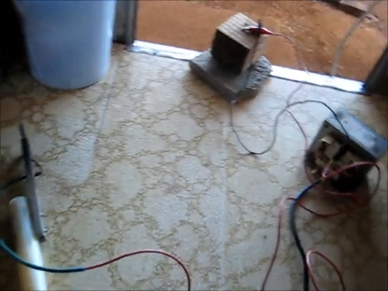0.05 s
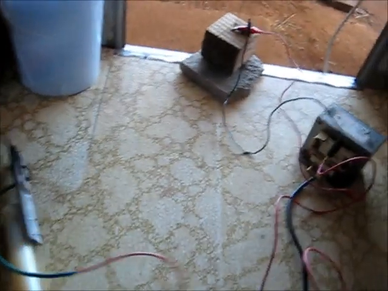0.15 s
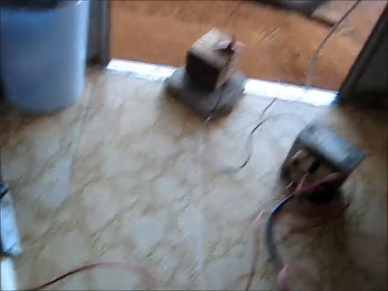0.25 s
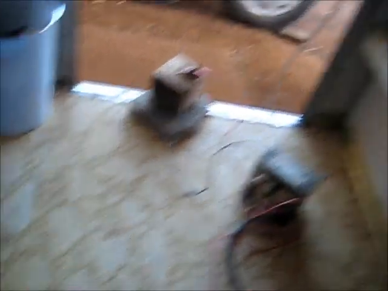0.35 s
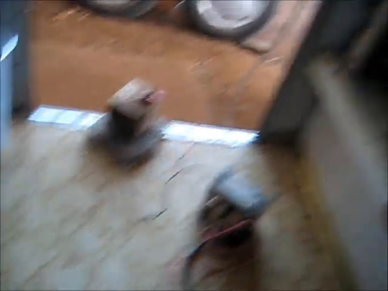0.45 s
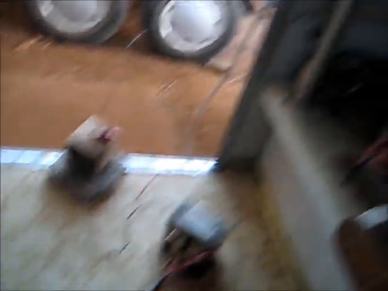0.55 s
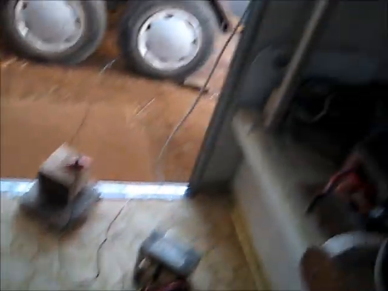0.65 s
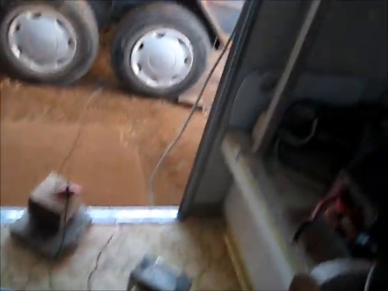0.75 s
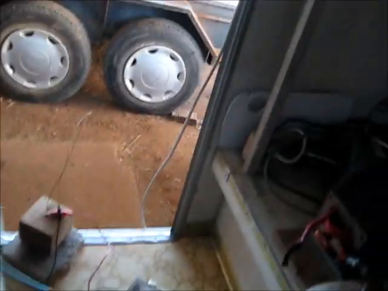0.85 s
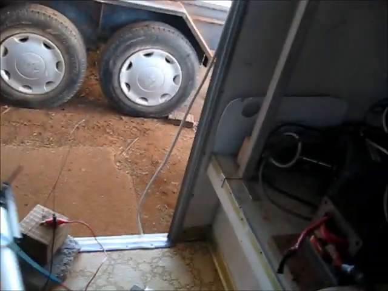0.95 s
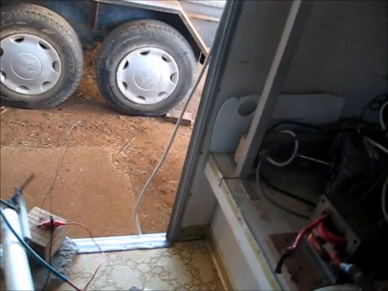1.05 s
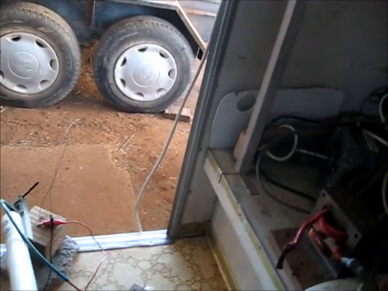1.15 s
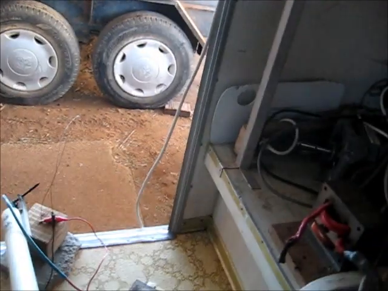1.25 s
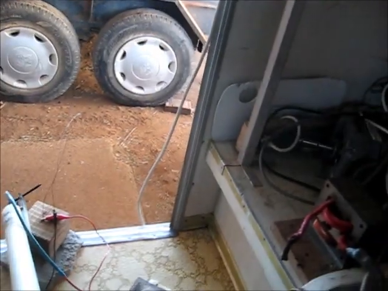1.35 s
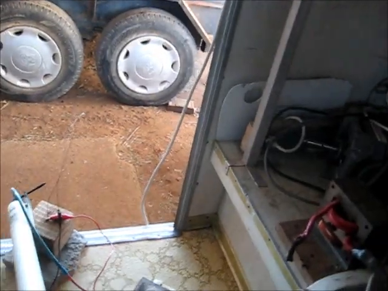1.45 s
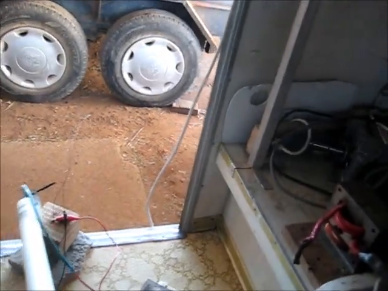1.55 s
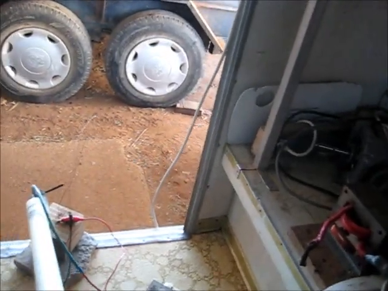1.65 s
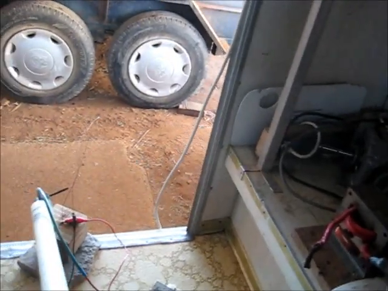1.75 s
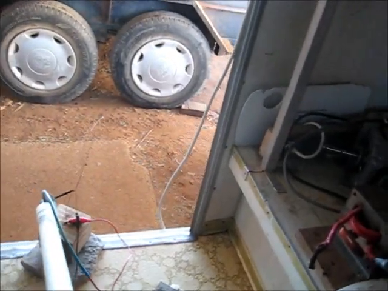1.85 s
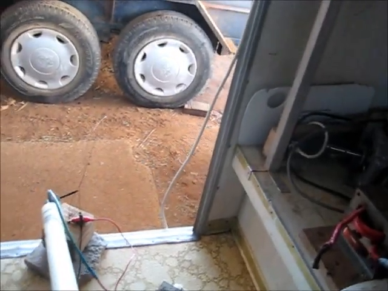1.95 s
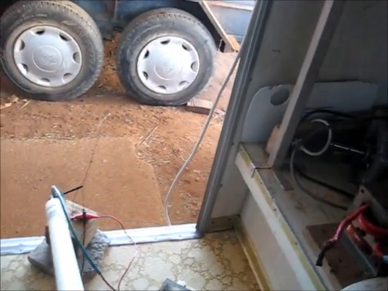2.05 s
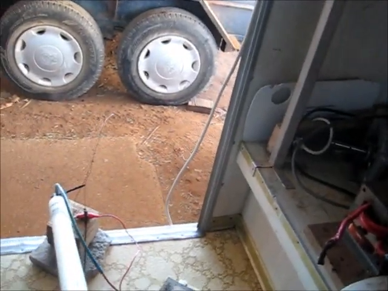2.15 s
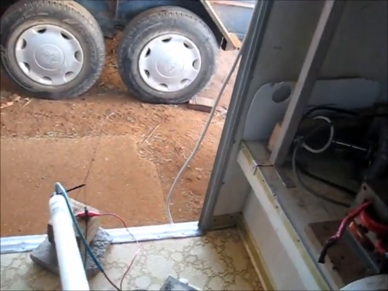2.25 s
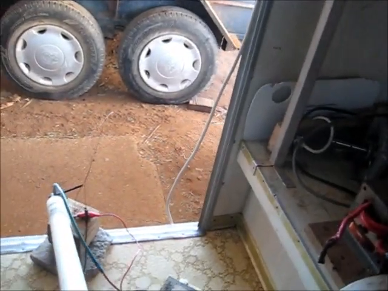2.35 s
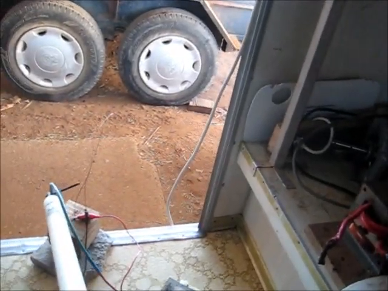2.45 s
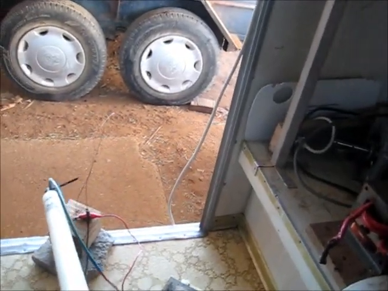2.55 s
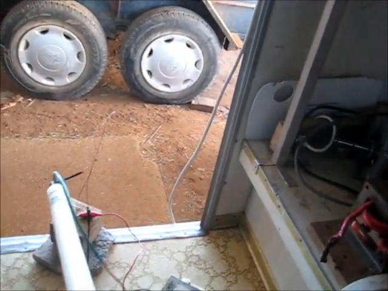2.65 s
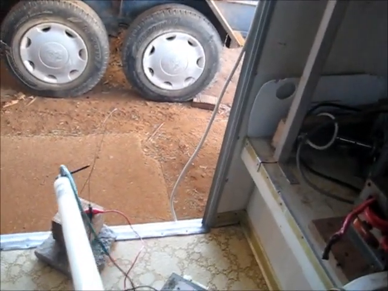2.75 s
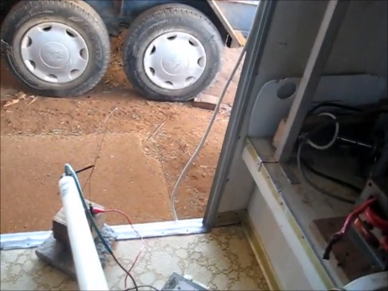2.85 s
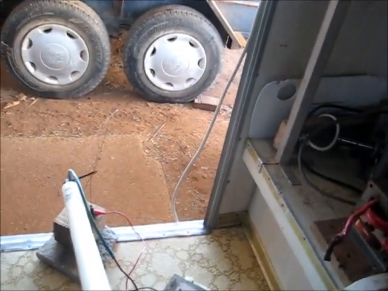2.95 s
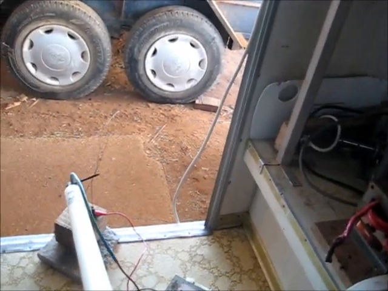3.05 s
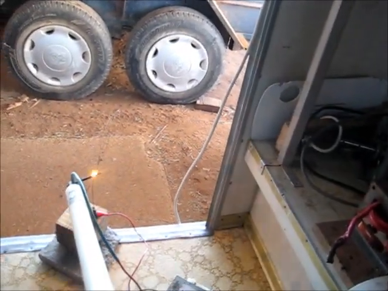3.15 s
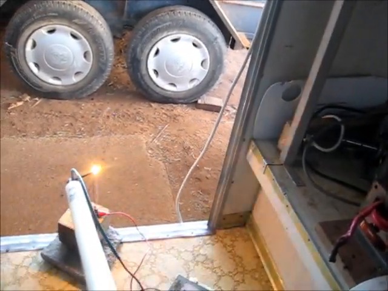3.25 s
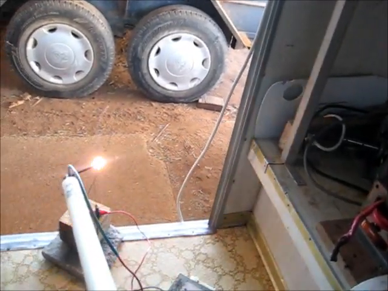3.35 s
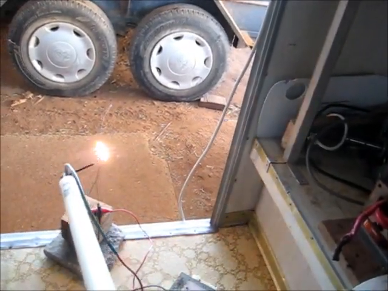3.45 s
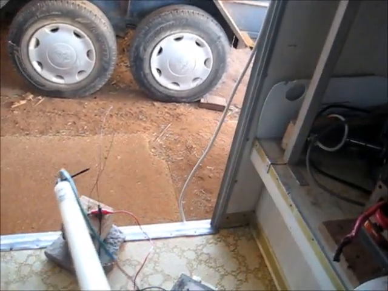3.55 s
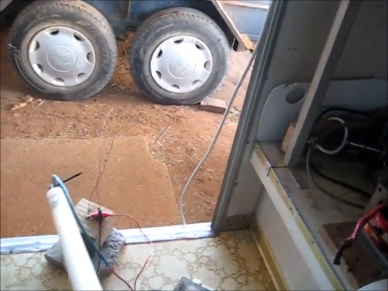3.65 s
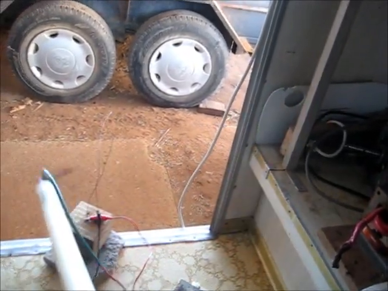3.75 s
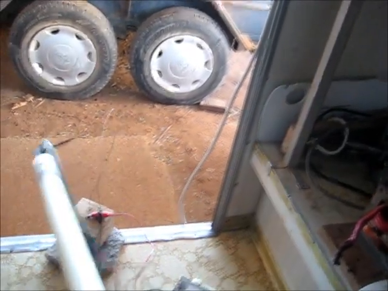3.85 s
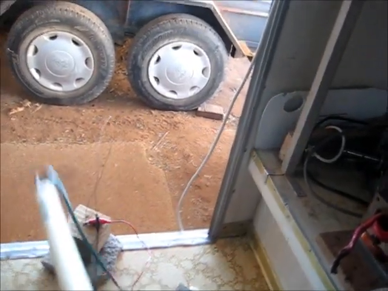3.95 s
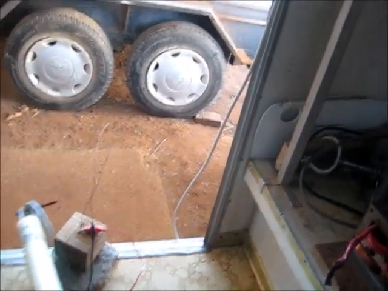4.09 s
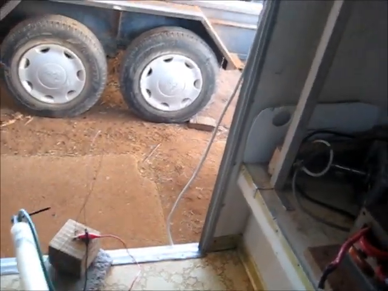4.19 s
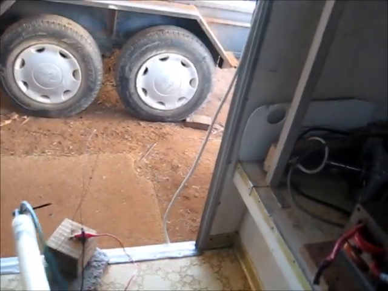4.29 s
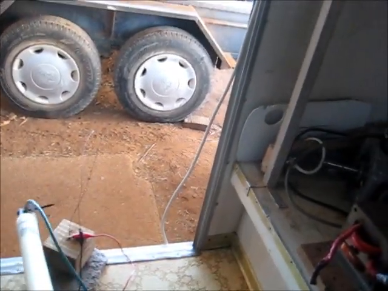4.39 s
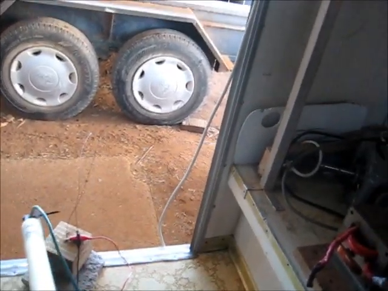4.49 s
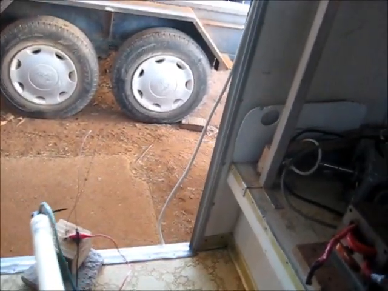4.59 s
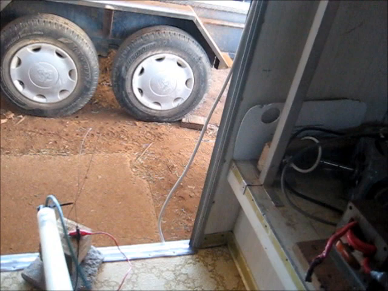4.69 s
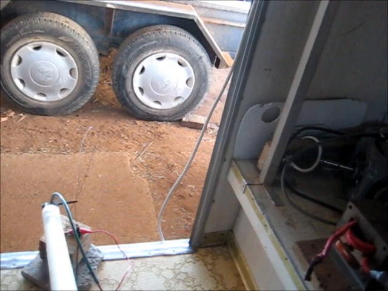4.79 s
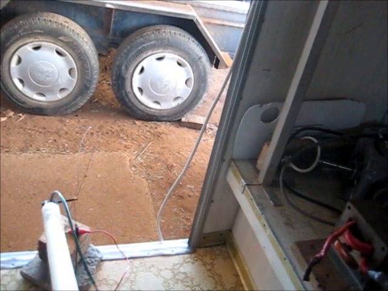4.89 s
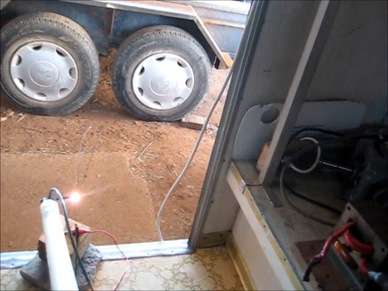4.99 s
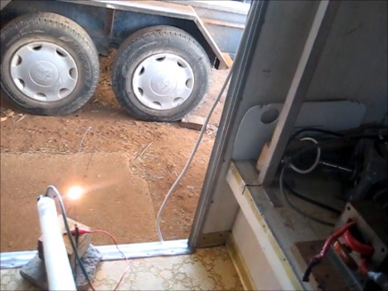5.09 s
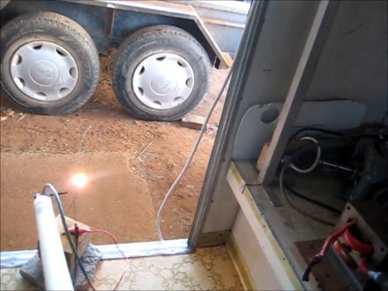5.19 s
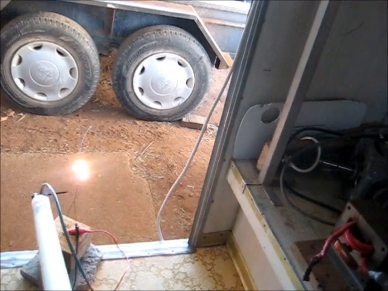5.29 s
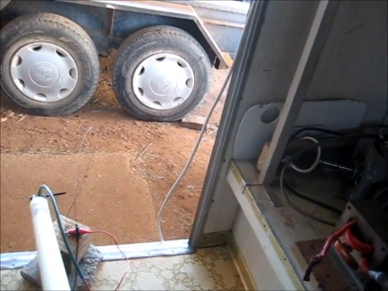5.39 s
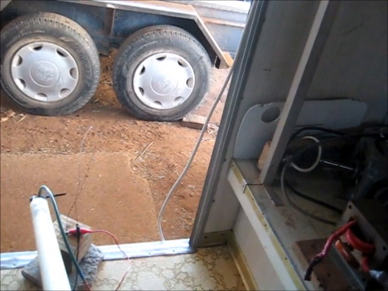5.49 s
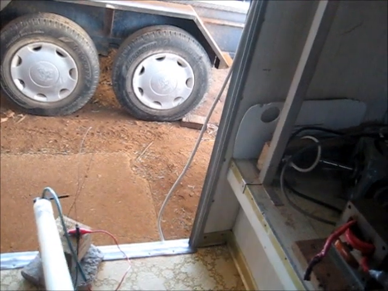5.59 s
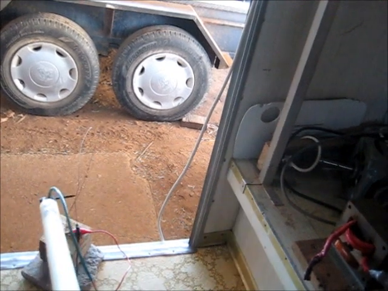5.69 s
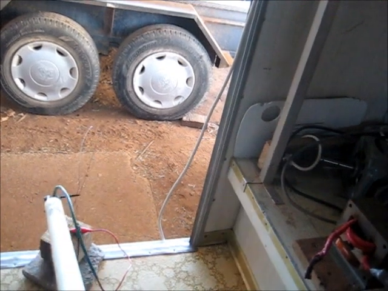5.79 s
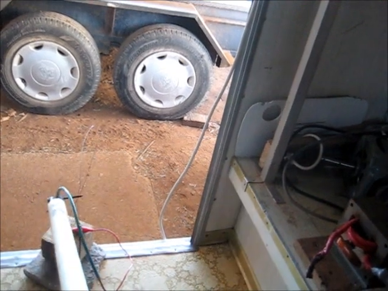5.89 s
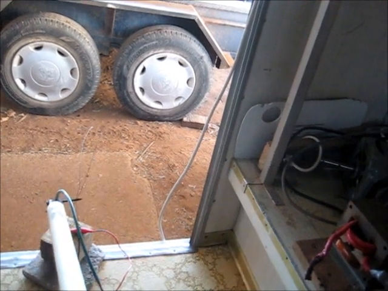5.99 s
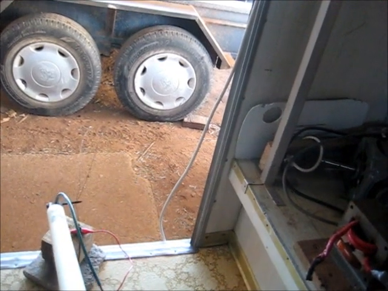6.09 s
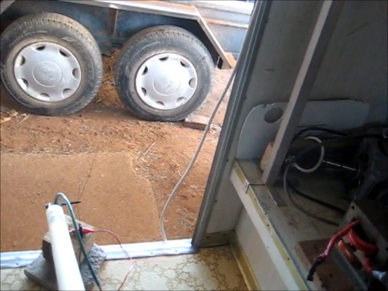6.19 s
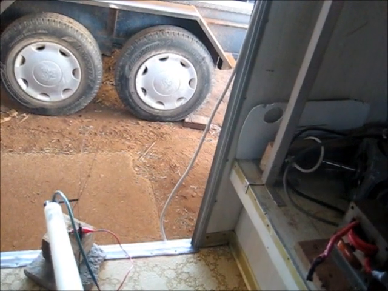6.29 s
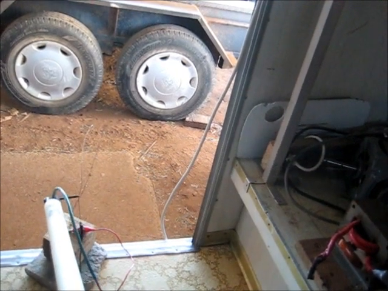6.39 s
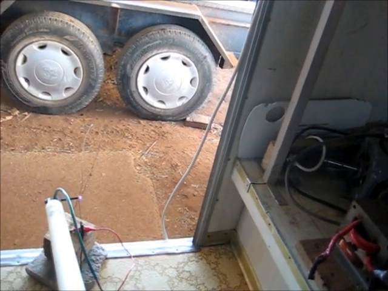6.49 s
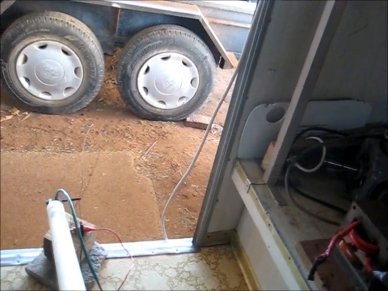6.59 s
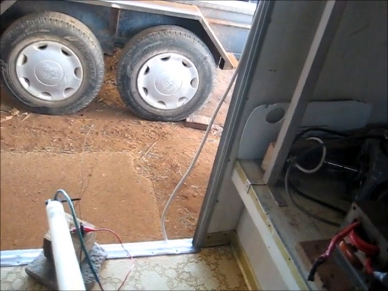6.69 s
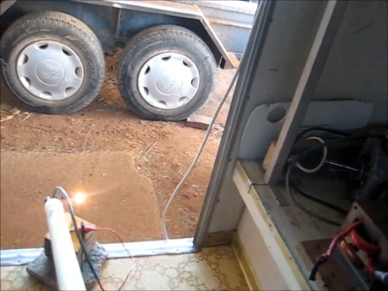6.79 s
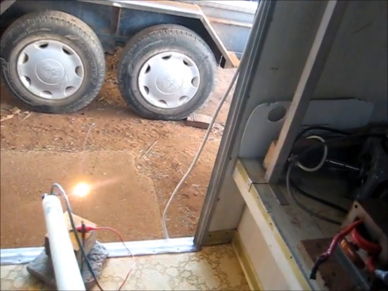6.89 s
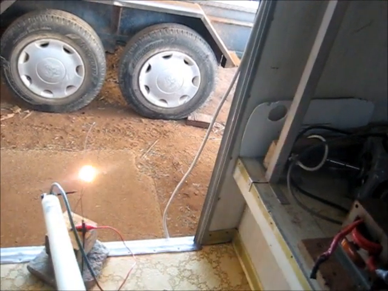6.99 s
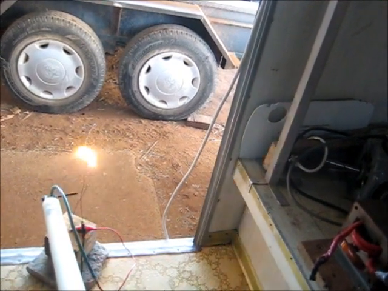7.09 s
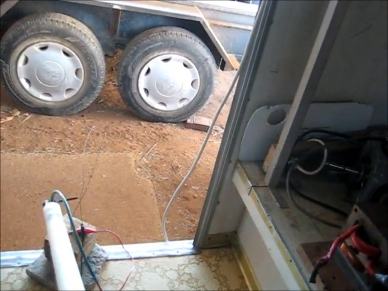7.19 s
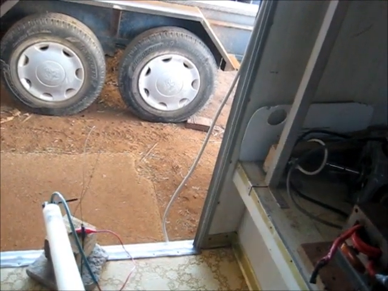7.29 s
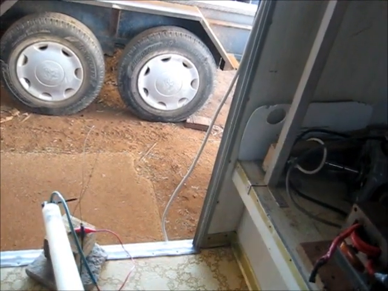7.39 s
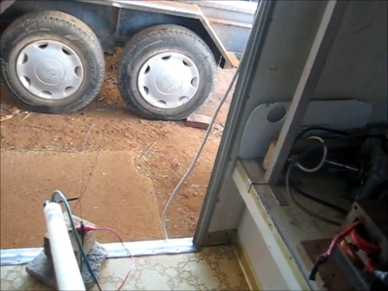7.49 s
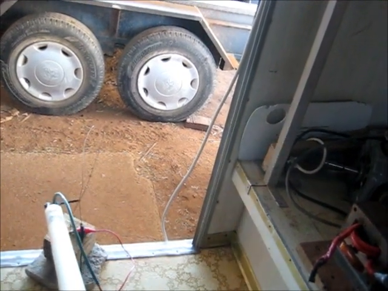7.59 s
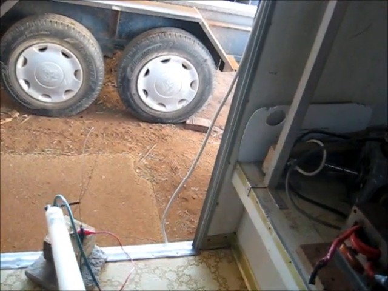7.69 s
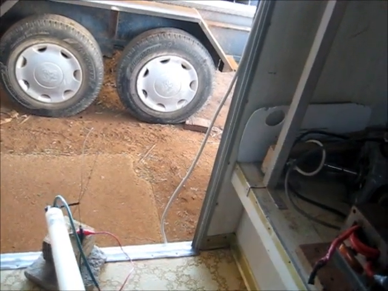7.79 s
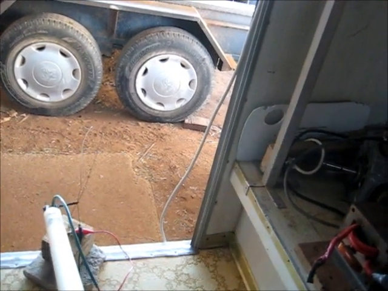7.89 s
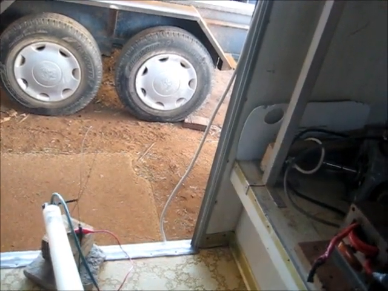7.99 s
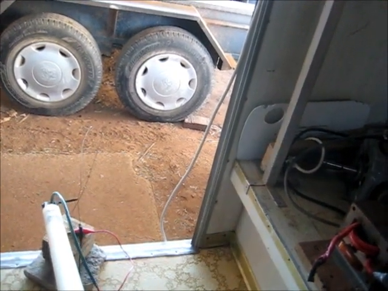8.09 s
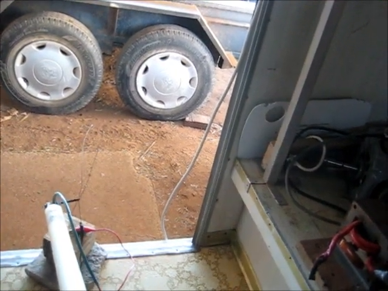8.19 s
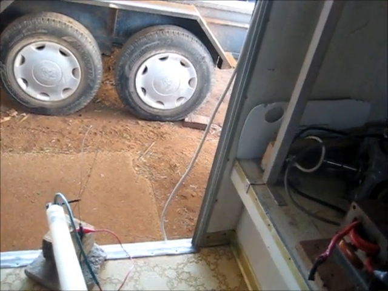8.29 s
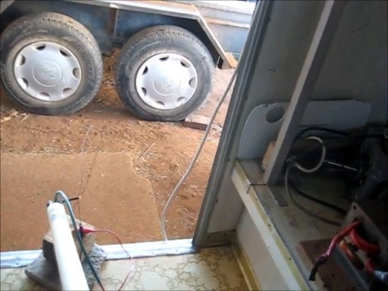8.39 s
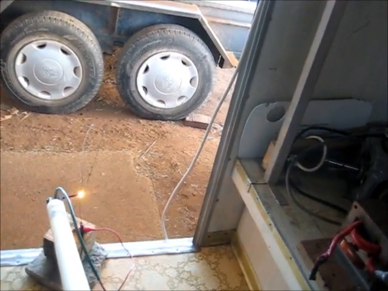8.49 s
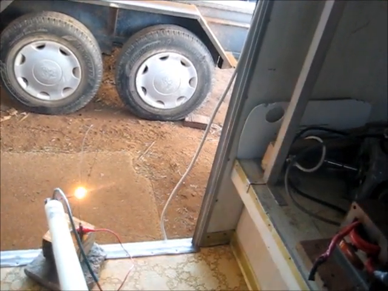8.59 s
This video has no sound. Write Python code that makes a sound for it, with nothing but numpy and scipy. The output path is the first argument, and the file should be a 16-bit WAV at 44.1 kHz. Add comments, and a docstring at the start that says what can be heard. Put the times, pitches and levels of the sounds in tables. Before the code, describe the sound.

Four short electric arcs buzz and crackle at double mains rate in a small workshop doorway, over faint transformer hum, hiss and handling knocks.

```python
"""Arcs drawn from a transformer

In the doorway of a small workshop an electrode on a plastic pipe draws four arcs from a mains transformer.
Each touch clicks and scrapes, as sparks and chatter ring the electrode. The arc then restrikes 100 times a second:
spark noise sizzles while it is short, restrike impulses crack and harmonics drone as it stretches, until it breaks.
The idle core hums under a steady hiss; the pipe knocks and ticks as it is handled, some of it close to the microphone.
"""
import sys
import numpy as np
from scipy import signal
from scipy.fft import rfft, irfft
from scipy.io import wavfile
from scipy.ndimage import uniform_filter1d

SR = 44100
rng = np.random.default_rng(int(sys.argv[2]) if len(sys.argv) > 2 else 0)


def store_wav(level_fs):
    """Save 16-bit WAV to argv[1]."""
    pcm = np.round(np.clip(np.atleast_2d(level_fs), -1, 1) * 32767)
    wavfile.write(sys.argv[1], SR, pcm.T.astype(np.int16))


N = 381198
T = np.arange(N) / SR

BUZZ_HZ = 100  # two half cycles of the mains
STRIKE_S = .0079  # where the restrike falls in each half cycle
# arc length runs from 0 at the terminal to 1 where it breaks; the column flares up at this length
FLARE_LENGTH = 0.28
# the arcs: [electrode touches t/s, arc strikes t/s, time to catch/s, dwell before the pull/s,
# length of the pull/s, arc breaks t/s, relative level/dB]
ARCS = [(3.02, 3.142, .007, 0.01, 0.31, 3.565, 0.76), (4.912, 4.909, .002, 0.075, 0.23, 5.404, 0.77),
        (6.559, 6.798, .004, 0.0083, 0.12, 7.178, -.6), (8.329, 8.448, 0.062, .006, .375, 8.98, 0.9)]
# snaps, the hardest restrikes: [t/s, relative level/dB]
SNAPS = [(3.2276, -6), (3.2378, -7), (3.2968, -2), (3.3149, -4), (3.3571, -1), (3.3988, 4), (3.4478, -3),
         (3.5378, -6), (5.0686, -6), (5.0776, -1.5), (5.1357, 1.5), (5.1681, 4), (5.1782, 0.5),
         (5.1884, -3.5), (5.1981, -2), (5.2276, 0), (5.2876, -2), (5.3787, -2.5), (6.888, -3), (6.8976, -2),
         (6.9276, 1), (6.958, 1.5), (6.9688, -1), (7.0078, 2.5), (7.0186, 3), (8.5289, -1.5), (8.5778, -3)]


def amp(db):
    """Decibels to gain."""
    return 10 ** (np.asarray(db) / 20)


def unit(x):
    """Scale to rms 1."""
    return x / np.sqrt(np.mean(x ** 2))


def noise():
    """White noise."""
    return rng.standard_normal(N)


def walk(rate):
    """Smooth random motion with a spread near 1, renewed at the given rate in Hz."""
    k = int(SR / rate)
    steps = np.repeat(rng.standard_normal(N // k + 1), k)
    return 1.4 * uniform_filter1d(steps, k)[:N]


def through(x, response):
    """Pass a sound through an impulse response."""
    return signal.fftconvolve(x, response)[:N]


def colour(points, size=4096):
    """Causal response of unit energy with the given (f/Hz, level/dB) spectrum."""
    hz, db = np.transpose(points)
    bins_hz = np.arange(size // 2 + 1) * SR / size
    gain = amp(np.interp(np.log(bins_hz + 1), np.log(hz), db))
    # folding the cepstrum gives minimum phase
    cepstrum = irfft(np.log(unit(gain)))
    cepstrum[1:size // 2] *= 2
    cepstrum[size // 2 + 1:] = 0
    return irfft(np.exp(rfft(cepstrum)))


def ring(modes, size=16384):
    """Response of unit energy of (f/Hz, level/dB, t60/s) modes."""
    t = T[:size]
    y = sum(amp(db) * np.exp(-np.log(1000) * t / t60) * np.cos(2 * np.pi * hz * t) for hz, db, t60 in modes)
    y *= 1 - np.exp(-4 * t * max(modes)[0])  # contact lasts a fraction of a cycle
    return y / np.linalg.norm(y)


def rattle(t60, size=16384):
    """Dying noise of unit energy, even across the spectrum."""
    decay = np.exp(-np.log(1000) * T[:size] / t60)
    spectrum = rfft(rng.standard_normal(size) * decay)
    smooth_power = uniform_filter1d(np.abs(spectrum) ** 2, size=size // 80)
    y = irfft(spectrum / np.sqrt(smooth_power))
    return y / np.linalg.norm(y)


def blows(times, gains):
    """Single impulses at the given times."""
    samples = np.clip(np.asarray(times) * SR, 0, N).astype(int)
    return np.bincount(samples, gains, N + 1)[:N]


def play(rows, sound):
    """Place sound(other columns) at each row's time and level."""
    out = np.zeros(N)
    for s, db, *rest in rows:
        i = int(s * SR)
        y = sound(*rest)[:N - i]
        out[i:i + len(y)] += amp(db) * y
    return out


def envelope(rows, attack_s, release_s):
    """Gain of (t/s, length/s, level/dB) strokes that rise, hold and die away."""
    gain = np.zeros(N)
    for s, hold, db in rows:
        rise = np.clip((T - s) / attack_s, 0, 1)
        fall = np.exp(-np.clip((T - s - hold) / release_s, 0, 50))
        gain += amp(db) * rise * fall
    return gain


def room(x, wet_db, low_t60=0.21, high_t60=0.15):
    """Close walls answer within a millisecond and die quickly, the treble first."""
    low, high = (signal.butter(2, 2800, kind, fs=SR, output="sos") for kind in ("low", "high"))
    tail = signal.sosfilt(low, rattle(low_t60)) + signal.sosfilt(high, rattle(high_t60))
    tail += amp(-3) * rattle(0.053)
    response = np.r_[1, np.zeros(40), amp(wet_db) * tail]
    return through(x, response / np.linalg.norm(response))


def background():
    """Steady coloured hiss with the thin whine of the camera's electronics, tones of unsteady phase."""
    # spectrum of the hiss: [f/Hz, relative level/dB]
    air_spectrum = [(25, -20.5), (70, -17.5), (110, -16), (200, -13), (800, -13.5), (2000, -16.5),
                    (5300, -20), (6300, -19), (8200, -24), (10700, -23.5), (12800, -28.5), (15800, -29.5)]
    # whining tones: [f/Hz, rms level/dB]
    whine_tones = [(7558, -69), (7870, -76), (15150, -64.5)]
    whine = sum(amp(db) * np.sin(2 * np.pi * hz * T + 0.84 * walk(90)) for hz, db in whine_tones)
    return amp(-49.14) * through(noise(), colour(air_spectrum)) + np.sqrt(2) * whine


def transformer():
    """The core hums in mains harmonics at idle and falls back from each touch until the arc breaks."""
    # harmonics of the idle hum: [f/Hz, rms level/dB]
    hum_tones = [(100, -73.5), (300, -56), (400, -65.5), (600, -88), (800, -76), (900, -71.5)]
    load = sum((T > touch) & (T < breaks) for touch, *_, breaks, _ in ARCS)
    sag_db = -8 * uniform_filter1d(load.astype(float), size=1500)
    hum = np.zeros(N)
    for hz, db in hum_tones:
        turns = BUZZ_HZ * round(hz / BUZZ_HZ) * T + rng.random()
        hum += amp(db + .5 * walk(5.2)) * np.sin(2 * np.pi * turns)
    return np.sqrt(2) * hum * amp(sag_db)


def handling():
    """Pipe and feet knock as dull noise bursts with a bright edge; metal modes clink, shaped noise rustles."""
    # knocks of the pipe and of feet on the floor: [t/s, relative body level/dB, relative edge level/dB]
    knock_rows = [(0.142, -19, -7.5), (0.198, -21, -8.5), (0.4, -16, -11), (0.968, -8, -10),
                  (0.98, -16, -16), (1.6, -8.5, -20), (3.885, -15, -5), (3.913, -20, -10),
                  (4.007, -23, -17), (4.187, -7, -9), (4.22, -18, -10.5), (4.456, -3.5, -8)]
    # spectrum of the knock's body: [f/Hz, relative level/dB]
    body_spectrum = [(100, -25), (280, -8.5), (750, 1), (1500, -3), (2200, -5.5), (4000, -17), (10000, -40)]
    # spectrum of the knock's bright edge: [f/Hz, relative level/dB]
    edge_spectrum = [(1000, -14), (2400, 1.5), (3600, 0.5), (7000, -9), (14000, -26)]
    # light metal clinks: [t/s, relative level/dB]
    clink_rows = [(2.176, -33.5), (2.1914, -35), (2.2169, -34), (2.354, -35.5), (2.408, -25.5)]
    # modes of the clinking metal: [f/Hz, relative level/dB, t60/s]
    clink_modes = [(3090, 4, 0.019), (4587, -5, .022), (5460, -6, .012), (6400, -2, .018), (8860, -2, .022),
                   (11000, -3.5, 0.02), (13200, -15, .015)]
    # rustle of sleeves and shoes: [t/s, length/s, relative level/dB, relative treble level/dB]
    rustle_rows = [(0, 0.53, -49.5, -49.5), (0.52, 0.077, -41.5, -37), (.64, .25, -57, -51.5),
                   (3.887, 0.082, -44, -44.5), (3.98, 0.074, -39, -54), (5.435, .07, -46, -74)]
    body = play([(s, db) for s, db, _ in knock_rows], lambda: through(rattle(0.03), colour(body_spectrum)))
    edge = play([(s, db) for s, _, db in knock_rows], lambda: through(rattle(0.014), colour(edge_spectrum)))
    clinks = play(clink_rows, lambda: ring(clink_modes) + 0.54 * rattle(.02))

    low = through(noise(), colour([(50, -31), (150, -6), (450, 0.0), (850, 3.0), (2200, -2.5), (5000, -22.0)]))
    high = through(noise(), colour([(300, -19), (1200, -15), (3600, -0.5), (7000, -7), (14000, -19.0)]))
    attack_s, release_s = 0.025, 0.016
    low *= envelope([(s, hold, db) for s, hold, db, _ in rustle_rows], attack_s, release_s)
    high *= envelope([(s, hold, db) for s, hold, _, db in rustle_rows], attack_s, release_s)
    rustle = (amp(-3) * low + amp(-1) * high) * amp(2.8 * walk(120))
    return body + amp(-1.0) * edge + amp(14) * clinks + rustle


def tick(hz):
    """Creaking plastic: a few cycles that swell and die within milliseconds."""
    rise = 1 - np.exp(-T[:1024] / 0.0003)
    y = rise * ring([(hz, 0, .0035)], size=1024)
    return y / np.linalg.norm(y)


def near_sounds():
    """Ticks, dry impulses and ringing bumps so close to the microphone that the room hardly answers."""
    # plastic creaking in the grip: [t/s, relative level/dB, f/Hz]
    tick_rows = [(1.435, -15, 3340), (1.651, -9.0, 4000), (1.759, -16.0, 3830), (1.904, -22.5, 3900),
                 (3.711, -10.5, 2900), (4.6, -15.5, 6100), (6.137, -18.5, 2880), (8.079, -16.5, 2770)]
    # dry clicks close to the microphone: [t/s, relative level/dB]
    click_rows = [(0.1982, -15), (0.4497, -3.5), (0.4562, -14), (1.4355, -16.0), (3.9165, -6.5),
                  (3.9442, -13), (3.9627, -10.5)]
    # bumps on the camera body: [t/s, relative level/dB]
    bump_rows = [(0.157, -35), (0.196, -42.5)]
    bump_modes = [(114, -7, .1), (144, 4, 0.15), (191, -1, 0.086),
                  (270, -16, 0.077), (345, 7.5, 0.06), (420, 5, 0.065)]  # (f/Hz, relative level/dB, t60/s)
    clicks = play(click_rows, lambda: colour([(500, -2), (3000, 3.5), (7000, 6.5), (15000, -5.0)]))
    bumps = play(bump_rows, lambda: ring(bump_modes))
    return play(tick_rows, tick) + amp(-2.5) * clicks + amp(27.5) * bumps


def electrode():
    """The tip sparks on touching, then chatters in random impulses over the terminal and rings."""
    # sparks as the electrode touches: [t/s, relative level/dB]
    touch_rows = [(3.02, -11), (3.0254, -12), (3.1016, -20), (3.147, -20), (4.9105, -20.5), (6.559, -13.5),
                  (6.6047, -14), (6.804, -15.5), (8.329, -17), (8.392, -24.5)]
    # spectrum of a touch: [f/Hz, relative level/dB]
    touch_spectrum = [(300, -11), (1600, -14.5), (2100, 0), (3500, -2), (6000, 1.5), (10000, 1),
                      (15000, -2.5)]
    # the electrode sliding on the terminal: [t/s, length/s, relative level/dB]
    slide_rows = [(3.02, .03, -37.5), (3.05, 0.072, -46.5), (4.912, 0.063, -40), (6.558, .13, -39),
                  (6.712, 0.085, -45), (8.329, 0.028, -44), (8.405, 0.052, -43.5)]
    # ringing of the electrode as it slides: [f/Hz, relative level/dB]
    rod_spectrum = [(500, -24), (1850, -11.5), (2050, 1.5), (2320, -7), (2620, -1), (2850, 0.5), (3150, 2),
                    (3900, -16), (5400, -9.5), (6300, -5.5), (7500, -12), (14000, -18)]

    def spark():
        """An impulse with a short rattle, in the colour of a touch."""
        return through(np.r_[1, np.zeros(2047)] + 0.78 * rattle(0.013, size=2048), colour(touch_spectrum))

    chatter = unit(noise() * (rng.random(N) < .02) * amp(5.3 * np.tanh(walk(120))))
    chatter *= envelope(slide_rows, attack_s=.005, release_s=0.007)
    return amp(9.5) * play(touch_rows, spark) + amp(-1) * through(chatter, colour(rod_spectrum))


def column():
    """Length of the arc and its gain: it catches, dwells, is pulled out and creeps longer until it breaks."""
    pulled_length = 0.87  # where the pull ends
    length, gain = np.zeros((2, N))
    for _, strike, catch, dwell, pull, breaks, db in ARCS:
        lit = (T >= strike) & (T < breaks)
        pull_s = strike + dwell
        length[lit] = np.interp(T[lit], [pull_s, pull_s + pull, breaks], [0, pulled_length, 1])
        gain[lit] = np.minimum((T[lit] - strike) / catch, 1) * amp(db)
    return length, uniform_filter1d(gain, size=128)


def drone(length, gain):
    """The long arc heats the air twice a mains cycle: wavering harmonics that grow all the way with length."""
    # harmonics of the drone: [multiple of the buzz, relative level/dB]
    harmonics = [(1, -18), (2, -7.5), (3, -3.5), (4, -5), (5, -13), (6, 5), (7, -11), (8, -18), (9, -1),
                 (10, -15), (11, 0)]
    full_db, rise_db = -36.5, 27
    strain_s, strain_db = 0.023, 3.5  # the swell just before the arc breaks
    turn = 2 * np.pi * BUZZ_HZ * (T - STRIKE_S)
    tone = sum(amp(db + 2 * walk(25)) * np.cos(k * turn + 0.59 * walk(30)) for k, db in harmonics)
    strain = sum(np.exp(-np.abs(T - breaks) / strain_s) for *_, breaks, _ in ARCS)
    level_db = full_db - rise_db * (1 - length) + strain_db * strain
    return unit(tone) * uniform_filter1d(gain * amp(level_db), size=800)


def snap(hz):
    """A hard restrike: a brief shock, lower for a bigger channel, with a short sputter."""
    shock = colour([(hz / 10, -28), (hz * 0.37, -2), (hz, 0), (hz * 1.62, -7), (hz * 5, -22)])
    return through(np.r_[1, np.zeros(1023)] + 0.43 * rattle(0.0065, size=1024), shock)


def snaps(length):
    """Each snap takes its pitch from its strength and the length of the arc: longer and louder is lower."""
    base_hz = 8600  # centre of a 0 dB snap in the shortest arc
    octaves_per_length, octaves_per_db = 1.96, 0.06
    rows = []
    for s, db in SNAPS:
        octaves_down = octaves_per_length * length[int(s * SR)] + octaves_per_db * db
        rows.append((s, db, base_hz / 2 ** octaves_down))
    return amp(1.5) * play(rows, snap)


def restrikes(jitter_s, scatter_db):
    """One uneven impulse in each half cycle of the mains."""
    times = np.arange(0, N / SR, 1 / BUZZ_HZ) + STRIKE_S
    late, size = rng.standard_normal((len(times), 2)).T
    return unit(blows(times + jitter_s * late, amp(scatter_db * np.clip(size, -2, 2))))


def arc(length, gain):
    """Tiny sparks crowd before each restrike, and the restrike itself cracks."""
    # spectrum of the sizzle: [f/Hz, relative level/dB]
    sizzle_spectrum = [(300, -23.5), (750, -17), (1100, -6), (1650, -9.5), (2150, -4.5), (2800, -5),
                       (4500, -2), (6500, 1), (9500, 1), (13000, 0), (15500, -9.5)]
    # crack of a short arc: [f/Hz, relative level/dB]
    short_crack = [(100, -36), (500, -17.5), (750, -14.5), (1050, -0.5), (1300, -4.5), (1700, -9.5),
                   (2130, 6), (2850, -9.5), (3800, -0.5), (5500, -11), (12000, -29)]
    # crack of a fully drawn arc: [f/Hz, relative level/dB]
    long_crack = [(100, -29), (480, -10), (680, -2.5), (1050, -1.5), (1300, -2.5), (2100, -5), (2900, -3),
                  (3900, -7), (5500, -12.5), (12000, -23)]
    # relative levels: the sizzle peaks at the flare, then fades as the arc stretches
    sizzle_db, sizzle_rise_db, sizzle_fade_db = -29, 6, 6
    # the gain of the crack grows until the flare, then holds
    crack_db, crack_rise_db = -34, 17.5
    # a snap unsettles the column, so that the next restrikes crack and sizzle harder
    surge_s, surge_crack_db, surge_sizzle_db = 0.018, 8, 3.5

    short = np.clip(1 - length / FLARE_LENGTH, 0, 1)
    stretch = np.clip((length - FLARE_LENGTH) / (1 - FLARE_LENGTH), 0, 1)
    snap_blows = blows([s for s, _ in SNAPS], amp([db for _, db in SNAPS]))
    surge = np.tanh(through(snap_blows, np.exp(-T[:16384] / surge_s)))
    gain = gain * amp(0.8 * walk(29.97))  # the level flickers at random
    sizzle_level_db = sizzle_db - sizzle_rise_db * short - sizzle_fade_db * stretch + surge_sizzle_db * surge
    crack_gain = gain * amp(crack_db - crack_rise_db * short + surge_crack_db * surge)
    hot = length ** 3.5  # near 1 when the column is long and hot
    swing = (1 + np.cos(2 * np.pi * BUZZ_HZ * (T - STRIKE_S + 0.00041))) / 2

    sparks = noise() * (rng.random(N) < .025) * amp(3.2 * noise())
    # a short arc goes quiet between restrikes; a long one keeps hissing
    sizzle = unit(sparks * (0.16 + 0.33 * hot + swing ** 3.6))
    sizzle += amp(-3.5 - 3 * length) * restrikes(jitter_s=0.00046, scatter_db=2.0)
    sizzle = through(sizzle * gain * amp(sizzle_level_db), colour(sizzle_spectrum))
    # a thick channel cracks more and loses its finest sparkle
    thickness = np.clip(1.1 * length, 0, .8)
    sizzle = (1 - thickness) * sizzle + thickness * uniform_filter1d(sizzle, size=3)

    strikes = restrikes(jitter_s=.00018, scatter_db=1.5)
    # each restrike trails a fresh cluster of small breakdowns
    cluster = unit(noise() * through(np.abs(strikes), np.exp(-T[:512] / 0.001)))
    hiss = unit(noise() * (0.39 + swing))
    crack = crack_gain * (amp(-4) * strikes + amp(-4) * cluster + amp(-4.5) * hiss)
    crack = through(crack * (1 - hot), colour(short_crack)) + through(crack * hot, colour(long_crack))
    return amp(2.0) * sizzle + crack


def scene():
    """All sources reach one microphone, heard alike on both channels; the drone, hum and hiss stay dry."""
    mono = background() + transformer()
    mono += room(handling(), wet_db=-1.5)
    mono += room(near_sounds(), wet_db=-10.5)
    mono += room(electrode(), wet_db=-1.5)
    length, gain = column()
    mono += drone(length, gain)
    mono += room(arc(length, gain) + snaps(length), wet_db=-1.5)
    return np.array([mono, mono])


def record(dry):
    """The camera cuts the top with a steep low-pass at 15.8 kHz."""
    return signal.sosfilt(signal.ellip(12, .2, 80, 15800, fs=SR, output="sos"), dry)


dry = scene()
out = record(dry)
store_wav(out)
```